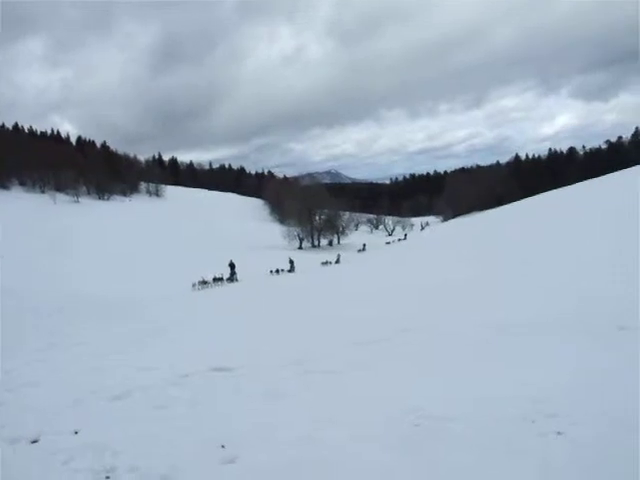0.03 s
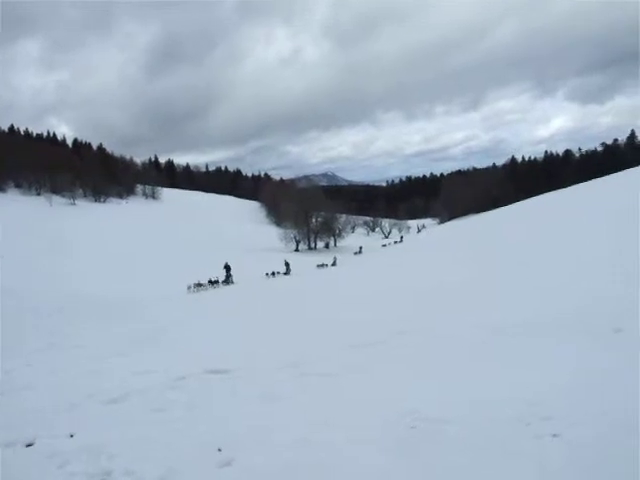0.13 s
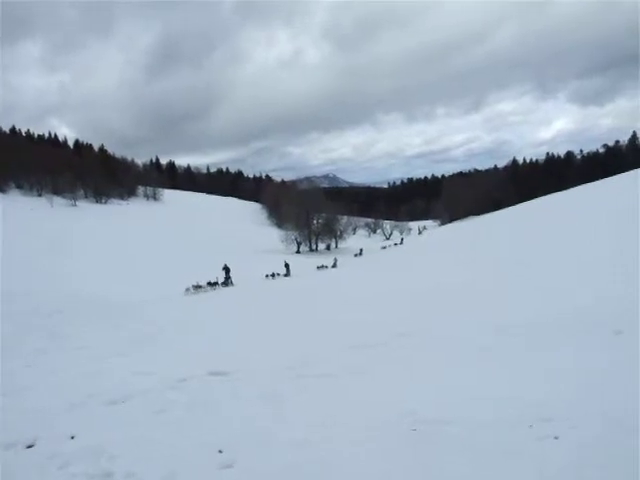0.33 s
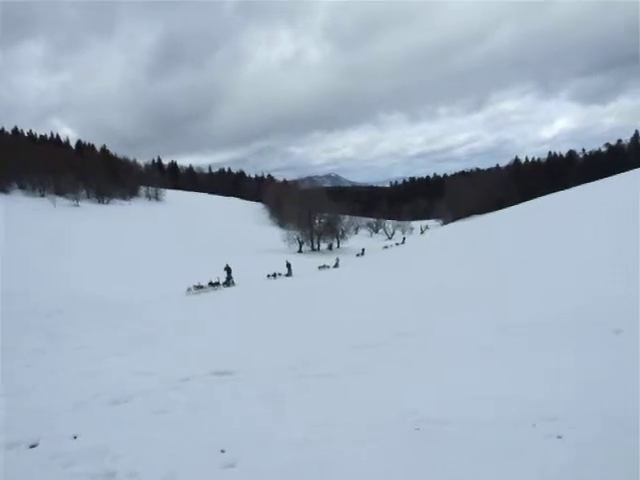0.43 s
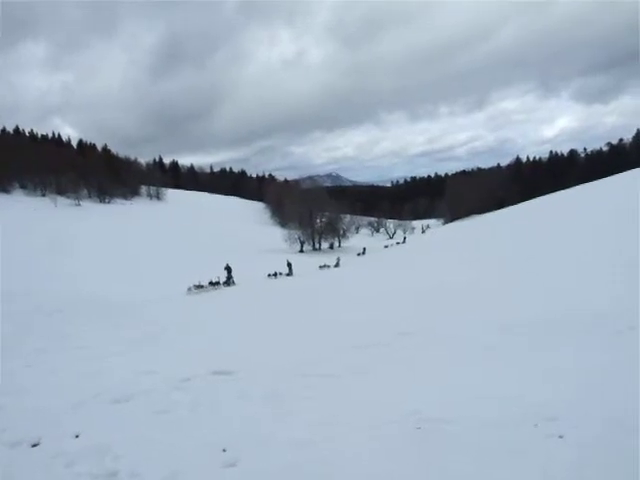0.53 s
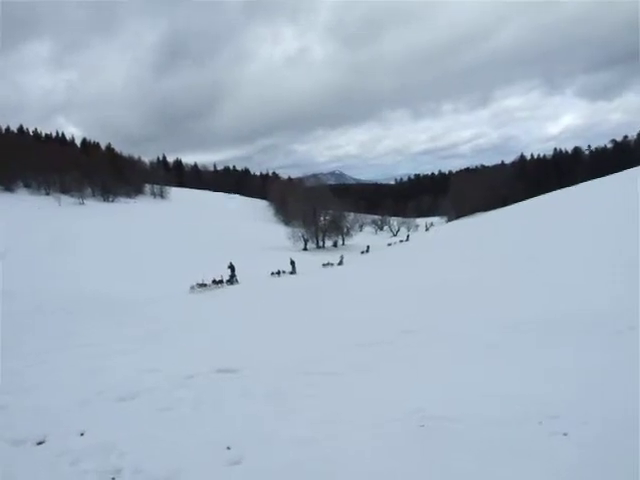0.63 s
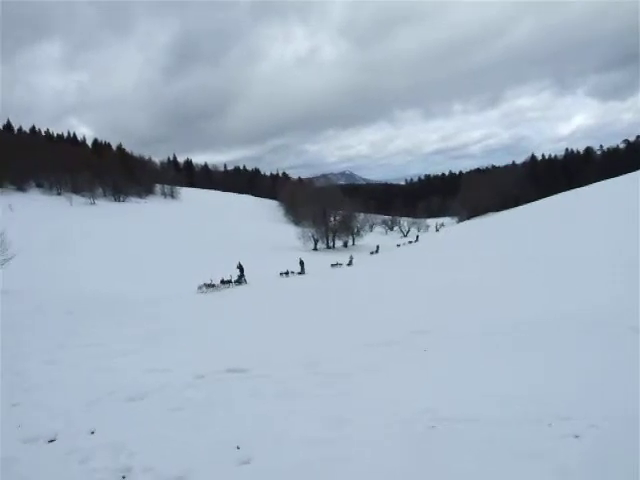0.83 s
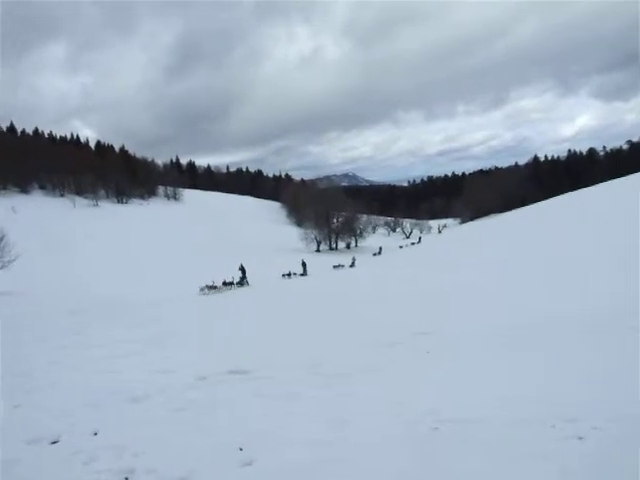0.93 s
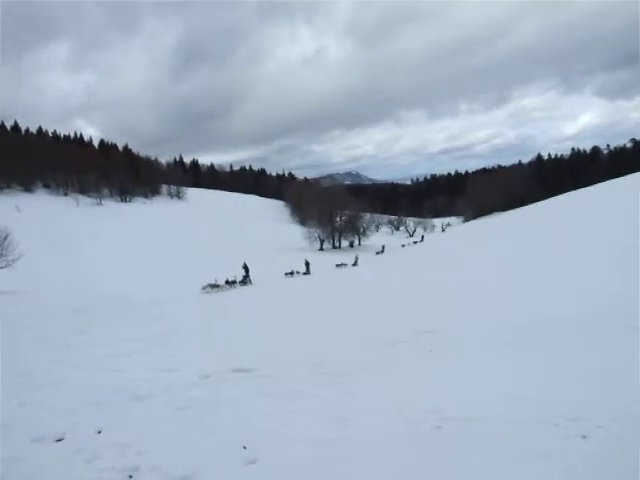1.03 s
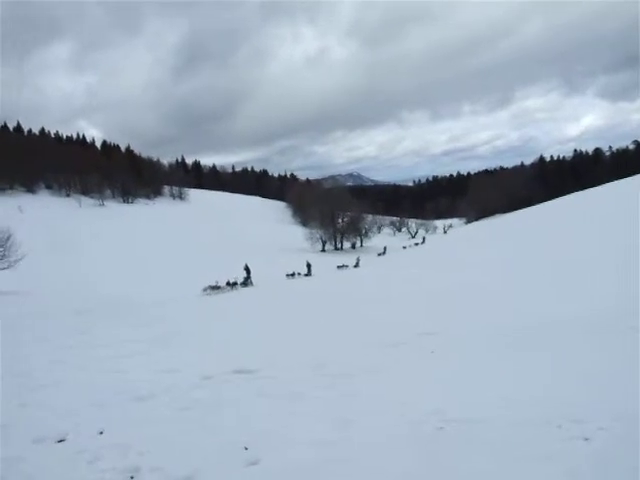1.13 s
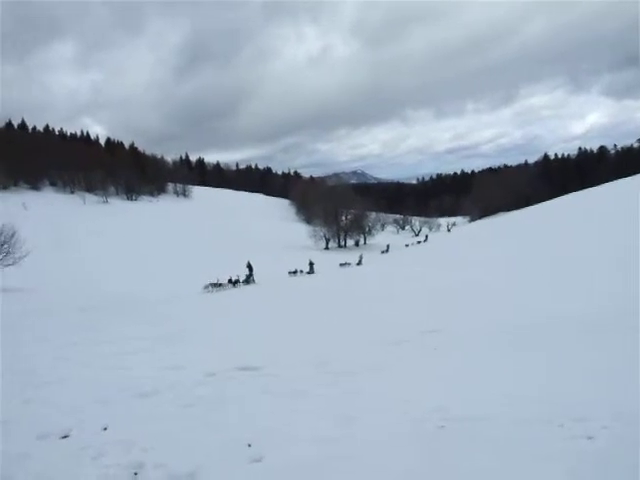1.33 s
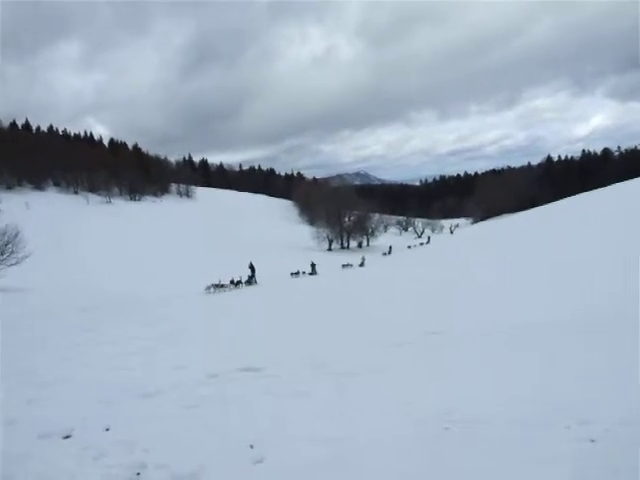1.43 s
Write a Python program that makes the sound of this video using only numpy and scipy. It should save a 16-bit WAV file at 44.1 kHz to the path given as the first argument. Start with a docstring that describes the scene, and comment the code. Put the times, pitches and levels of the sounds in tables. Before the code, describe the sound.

Dogs yelp and bark in quick alternation, two whistling cries and two rough barks, each rising then falling in pitch. The open snowy slope returns slight echoes, while other dogs whine faintly far away under a soft hiss.

```python
"""Two clean, whistling yelps alternate with two hoarse barks: sled dogs across an open snowy slope.
Each call arches in pitch and drops as the breath runs out. Tight vocal folds make the yelps nearly
pure; pushed harder, they split into the rough undertones of a bark. The forest edge throws back
faint echoes, other dogs whine far away, and a thin steady hiss lies under it all."""
import sys
import numpy as np
from scipy import signal
from scipy.fft import rfft, irfft
from scipy.io import wavfile
from scipy.ndimage import uniform_filter1d

SR = 44100
rng = np.random.default_rng(int(sys.argv[2]) if len(sys.argv) > 2 else 0)


def transcribe(u):
    """Save the signal u as a 16-bit wav file named by the first command-line argument.

    u: samples, shape (n,) or (channels, n), limited to [-1, 1]; the rate is SR.
    q: integer samples, one column per channel.
    """
    v = np.clip(np.atleast_2d(u).T, -1, 1)
    q = np.round(v * 32767).astype(np.int16)
    wavfile.write(sys.argv[1], SR, q)


N = 66150
TIME = np.arange(N) / SR

# Colour of the background hiss. Each row: frequency in Hz, relative level in dB.
HISS_SPECTRUM = [(12, -22), (28, -9.5), (65, -15), (122, -15), (330, -14.5), (475, -13.5), (900, -11),
                 (1060, -4.5), (1370, -5.5), (1530, -18.5), (2150, -10.5), (2490, -16.5), (4000, -17),
                 (7260, -16.5), (8400, -26), (9000, -35)]
# Echoes off the slope and the trees. Each row: delay in seconds, level in dB.
SLOPE_ECHOES = [(0.079, -16.5), (.103, -19.5), (0.127, -28.5), (.236, -34), (.274, -30)]
# Distant dogs. Each row: start and length in seconds, first and last pitch in Hz, level in dB.
DISTANT_WHINES = [(0.099, 0.047, 700, 758, -47), (0.118, 0.12, 850, 790, -52.5),
                  (0.186, 0.015, 310, 348, -47.5), (0.864, .085, 910, 656, -53.5),
                  (1.49, 0.018, 600, 525, -40)]
# Faint high squeaks. Each row: midpoint and length in seconds, centre pitch in Hz, level in dB.
HIGH_SQUEAKS = [(0.569, 0.021, 4610, -49.5), (0.777, .022, 4873, -58), (1.243, .028, 4380, -52.5)]
# The open mouth rings above the first yelp. Each row: time in seconds, level in dB.
MOUTH_RING = [(.207, -68.5), (.243, -51), (.272, -57.5), (.300, -65)]
# A second tone in the last bark. Each row: time in seconds, pitch in Hz, level in dB.
BARK_WHISTLE = [(1.098, 1180, -39.5), (1.114, 1227, -18.5), (1.145, 1274, -17.5), (1.168, 1308, -19),
                (1.190, 1344, -21), (1.212, 1237, -22.5), (1.224, 1230, -42), (1.238, 1070, -41)]
# Throat and mouth of the barking dog. Each row: frequency in Hz, gain in dB.
THROAT_RESPONSE = [(200, -31.5), (330, -33.5), (460, -7), (720, 4.5), (1000, 7), (1400, -3), (1780, -2.5),
                   (2050, -20.5), (2350, -16), (2900, -51), (4500, -38.5), (8000, -54.5)]
# One list per bark. Each row: time in seconds, pitch in Hz, level in dB, roughness from 0 to 1,
# overtones in dB.
BARK_CURVES = [
    [(.380, 388.8, -44, 0.22, -24.5), (.398, 511.3, -33, 0.2, -11.5), (.412, 584.4, -20.5, 0.2, 2),
     (.423, 738.6, -13.5, 0.38, -11.5), (.443, 908.7, -16, 0.6, 1), (.467, 918, -16, 0.52, -1),
     (.492, 1027, -15.5, 0.48, -8.5), (.512, 954.5, -19.5, 0.55, -15), (.538, 689.6, -18, 0.47, -8),
     (.553, 523, -37, 0, -8), (.566, 420, -47.5, 0.1, -6)],
    [(1.078, 368.7, -37, 0.21, -14.5), (1.092, 447.6, -31, 0.54, -12.5), (1.106, 569.8, -15.5, 0.88, -9),
     (1.122, 801.6, -17.5, 0.86, 2), (1.150, 948.5, -18.5, 0.67, -6), (1.170, 982.7, -16, 0.37, -7.5),
     (1.195, 913, -23, 0.56, -3), (1.215, 691, -21.5, 0.21, -10.5), (1.228, 551, -36, 0.42, -5),
     (1.238, 454, -33, 0.3, -7.5)],
]
# Faint, broad, low-leaning noise that follows each yelp's loudness.
# Each row: frequency in Hz, relative level in dB.
YELP_NOISE_SPECTRUM = [(60, -4), (130, -3), (700, -2.5), (2500, -8.5), (8000, -32)]
# One list per yelp. Each row: time in seconds, pitch in Hz, then level, overtones and undertones in dB.
YELP_CURVES = [
    [(.205, 1258, -44, -26.5, -52), (.209, 1223, -20.5, -26.5, -56.5), (.231, 1265, -13.5, -22.5, -41),
     (.260, 1379, -12.5, -39, -52.5), (.289, 1447, -17, -61, -58), (.306, 1325, -21, -25.5, -41),
     (.313, 1145, -26.5, -9.5, -42.5), (.325, 799, -42, -5, -35.5), (.345, 374, -52, -23.5, -27.5)],
    [(.697, 790, -27, -22, -42), (.701, 768, -16.5, -19.5, -45), (.705, 755, -19.5, -11, -36.5),
     (.708, 919, -21, -5, -52), (.721, 1038, -12.5, -18.5, -54.5), (.745, 1059, -13, -10, -41),
     (.780, 1077, -16.5, -14.5, -18.5), (.798, 1151, -17, -20, -25.5), (.822, 1096, -24, -19.5, -55.5),
     (.839, 936, -34, -2.5, -49.5), (.853, 483, -49, -23.5, -39), (.870, 360, -51.5, -11.5, -28)],
]


def from_db(db):
    """Decibels to gain."""
    return 10 ** (np.asarray(db) / 20)


def rms_one(x):
    """Scale to unit power."""
    return x / np.sqrt(np.mean(x ** 2) + 1e-20)


def curves(rows):
    """A gate that opens for the call, then each column as a smoothed automation curve."""
    times, *columns = np.transpose(rows)
    gate = uniform_filter1d(((TIME > times[0]) & (TIME < times[-1])) * 1., size=90)
    return [gate] + [uniform_filter1d(np.interp(TIME, times, c), size=130) for c in columns]


def gain_at(spectrum, hz):
    """Gain of an EQ curve at these frequencies."""
    points_hz, db = np.transpose(spectrum)
    return from_db(np.interp(np.log(hz + 1e-9), np.log(points_hz), db))


def noise(spectrum):
    """Coloured noise of unit power."""
    colour = gain_at(spectrum, np.fft.rfftfreq(N, 1 / SR))
    return rms_one(irfft(rfft(rng.standard_normal(N)) * colour, N))


def drift(hz):
    """Random wavering up to this rate, at unit power."""
    return rms_one(signal.sosfilt(signal.butter(2, hz, fs=SR, output="sos"), rng.standard_normal(N)))


def phase_of(hz):
    """Running phase of a vibration."""
    return 2 * np.pi * np.cumsum(hz) / SR


def hiss(db=-51):
    """A thin, steady bed of noise."""
    return from_db(db) * noise(HISS_SPECTRUM)


def forest_echoes(x, tail_db=-45.5, t60_s=1.1, scatter_db=-7, scatter_s=.028, low_cut_hz=2700):
    """A few distinct, thin echoes, each smeared by the trunks, over a faint long tail."""
    tail = rng.standard_normal(N) * from_db(-60 * TIME / t60_s)
    response = from_db(tail_db) * rms_one(tail) / np.sqrt(N)
    for delay, db in SLOPE_ECHOES:
        smear = rng.standard_normal(N) * (TIME > delay) * np.exp(-np.abs(TIME - delay) / scatter_s)
        response += from_db(db + scatter_db) * rms_one(smear) / np.sqrt(N)
        response[int(delay * SR)] += from_db(db)
    thin = signal.sosfilt(signal.butter(1, low_cut_hz, "high", fs=SR, output="sos"), x)
    return signal.fftconvolve(thin, response)[:N]


def clean_voice(hz, overtones_db, undertone_gain=0, jitter=.00083, shimmer_db=.63):
    """Tight vocal folds: nearly a sine, with weak overtones and an optional slower vibration."""
    phase = phase_of(hz * (1 + jitter * drift(220)))
    overtones = sum(from_db(overtones_db + db) * np.sin(k * phase) for k, db in [(2, -2), (3, -30.5)])
    slow_phase = .585 * phase
    sidebands = np.sin(phase + slow_phase) + np.sin(2 * phase - slow_phase)
    undertones = np.sin(slow_phase) + from_db(-6) * sidebands
    voice = np.sin(phase) + overtones + undertone_gain * undertones
    return voice * np.sqrt(2) * from_db(shimmer_db * drift(75))


def far_whine(start, length, first_hz, last_hz, db):
    """A short glide from a dog far down the trail."""
    progress = np.clip((TIME - start) / length, 0, 1)
    swell = np.abs(np.sin(np.pi * progress)) ** .5
    hz = first_hz + (last_hz - first_hz) * progress
    return from_db(db) * swell * clean_voice(hz, overtones_db=-8)


def squeak(middle, length, hz, db, fall_hz_per_s=5000, waver_hz=190):
    """A faint, high, slightly falling squeak during a call or at its end."""
    offset = np.clip(TIME - middle, -2 * length, 2 * length)
    swell = np.exp(-(2 * offset / length) ** 2)
    pitch = hz - fall_hz_per_s * offset + waver_hz * drift(590)
    return from_db(db) * swell * np.sqrt(2) * np.sin(phase_of(pitch))


def mouth_ring(step_db=5.5):
    """The open mouth puts a thin edge of harmonics 3 to 5 on the first yelp."""
    gate, db = curves(MOUTH_RING)
    phase = phase_of(curves(YELP_CURVES[0])[1])
    ring = sum(from_db(db - step_db * (k - 3) + 2 * drift(60)) * np.sin(k * phase) for k in (3, 4, 5))
    return gate * np.sqrt(2) * ring


def whistle():
    """A second pitch that sings on its own above the last bark."""
    gate, hz, db = curves(BARK_WHISTLE)
    return gate * from_db(db) * clean_voice(hz, overtones_db=-33)


def bark(rows, jitter=.03, split_from_hz=540, split_over_hz=200, wander_rad=2.2, rasp_db=-10):
    """Pushed hard, the folds jitter and repeat only every second or fourth cycle; air rasps past."""
    gate, hz, db, rough, overtones_db = curves(rows)
    rough = np.clip(rough, 0, 1)
    phase = phase_of(hz * (1 + jitter * rough * drift(171)))
    voice = gain_at(THROAT_RESPONSE, hz) * np.sin(phase)
    # The voice breaks into undertones as pitch and roughness climb.
    split = rough * np.clip((hz - split_from_hz) / split_over_hz + rough ** 2, 0, 1)
    bright_db_per_octave = .4 * (overtones_db + 4)   # stronger overtones brighten the whole bark
    for order in np.arange(1, 21) / 4:
        if order == 1:
            continue
        if order % 1 == 0:
            strength = from_db(overtones_db)
        elif order % .5 == 0:
            strength = split * from_db(.5)
        else:
            strength = split * np.sqrt(rough) * from_db(2.5)
        tilt_db = bright_db_per_octave * max(np.log2(order), 0) - .5 * max(np.log2(order / 2), 0)
        colour = from_db(tilt_db) * gain_at(THROAT_RESPONSE, order * hz)
        flutter = 1 + .34 * rough * drift(60)
        wander = 2 * np.pi * rng.random() + wander_rad * rough ** 2 * drift(60)
        voice += strength * colour * flutter * np.sin(order * phase + wander)
    voice += from_db(rasp_db) * rough ** 2 * noise(THROAT_RESPONSE) * (1 + .5 * np.cos(phase / 2))
    levelled = voice / np.sqrt(uniform_filter1d(voice ** 2, size=500) + 1e-9)
    uneven_push_db = .2 * rough * drift(91)
    return gate * from_db(db + uneven_push_db) * levelled


def yelp(rows, noise_db=-36.5):
    """A sudden, clean cry from tight folds that climbs and falls; faint noise follows its loudness."""
    gate, hz, db, overtones_db, undertones_db = curves(rows)
    voice = clean_voice(hz, overtones_db, from_db(undertones_db))
    faint_noise = from_db(noise_db) * noise(YELP_NOISE_SPECTRUM)
    return gate * from_db(db) * (voice + faint_noise)


def scene():
    """Near and far dogs, their echoes and the hiss, mixed in mono."""
    dogs = sum(yelp(rows) for rows in YELP_CURVES) + mouth_ring()
    dogs += sum(bark(rows) for rows in BARK_CURVES) + whistle()
    dogs += sum(far_whine(*row) for row in DISTANT_WHINES)
    dogs += sum(squeak(*row) for row in HIGH_SQUEAKS)
    return (dogs + forest_echoes(dogs) + hiss())[None]


def record(dry, stop_hz=9300, dc_offset=-.0026):
    """A small microphone with a steep top cut and a slight constant offset."""
    return dc_offset + signal.sosfilt(signal.cheby2(14, 60, stop_hz, fs=SR, output="sos"), dry)


dry = scene()
out = record(dry)
transcribe(out)
```